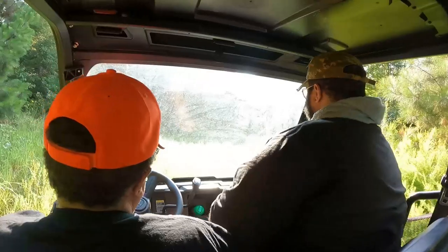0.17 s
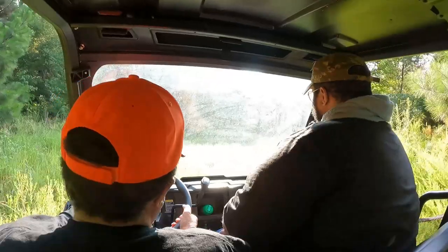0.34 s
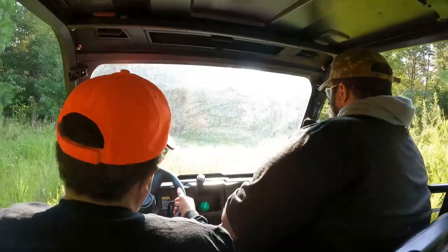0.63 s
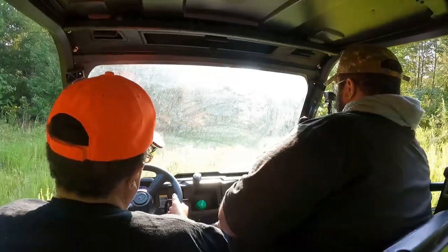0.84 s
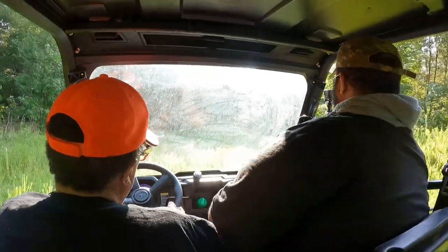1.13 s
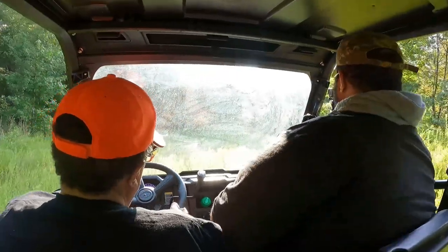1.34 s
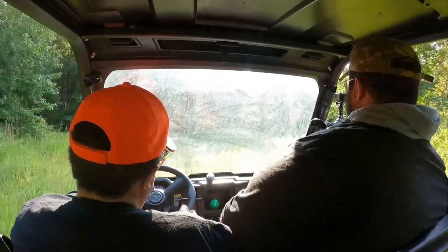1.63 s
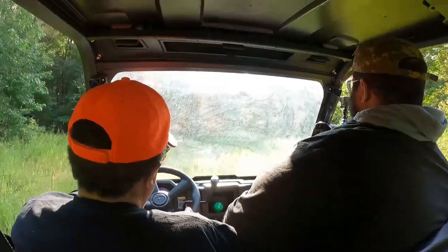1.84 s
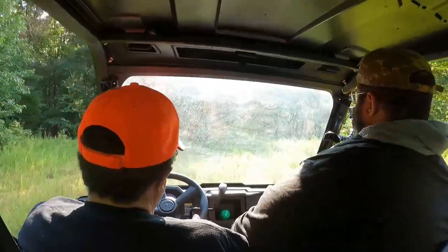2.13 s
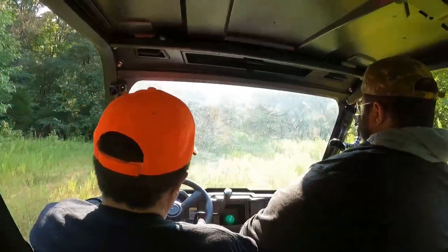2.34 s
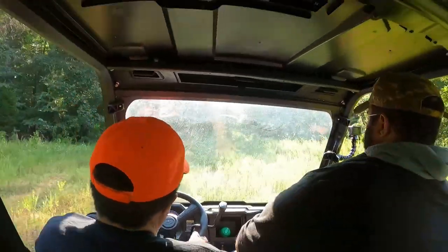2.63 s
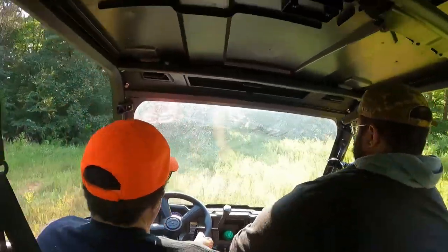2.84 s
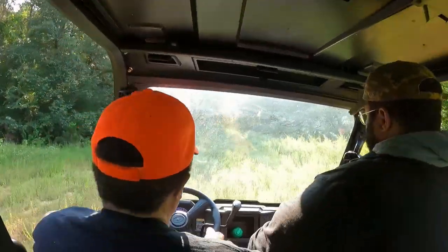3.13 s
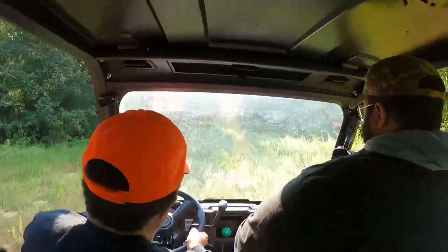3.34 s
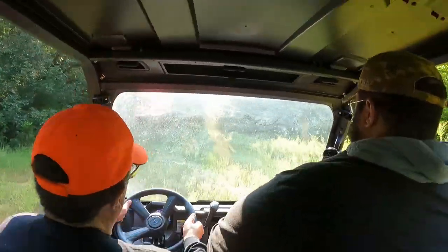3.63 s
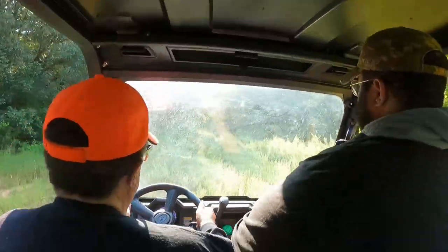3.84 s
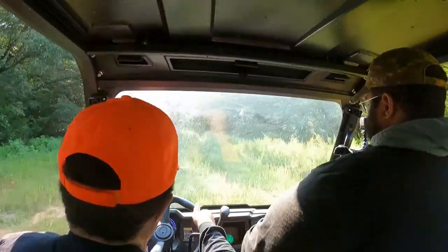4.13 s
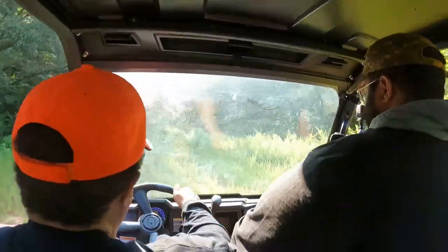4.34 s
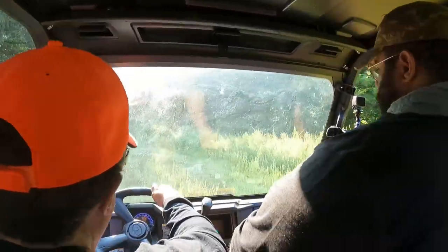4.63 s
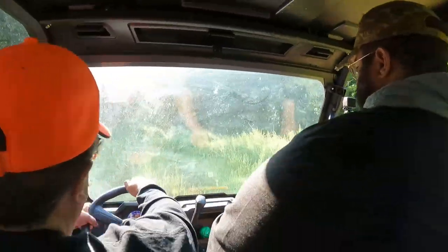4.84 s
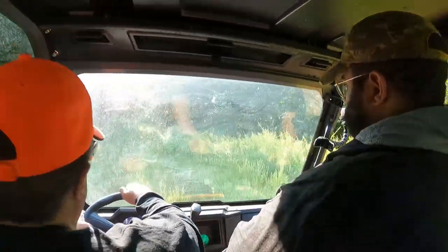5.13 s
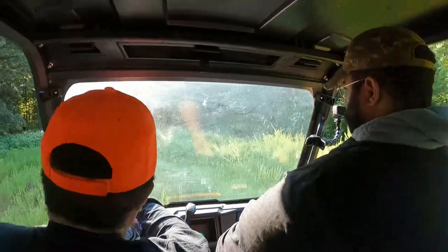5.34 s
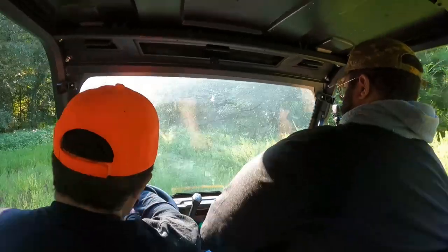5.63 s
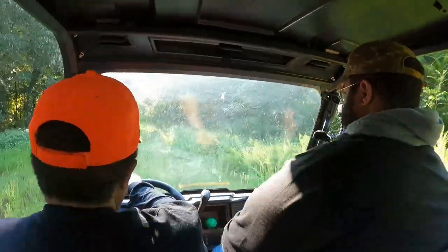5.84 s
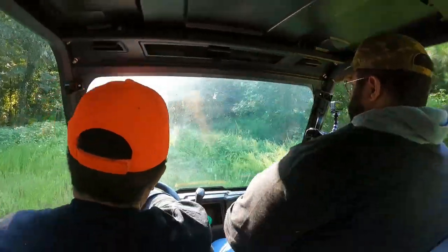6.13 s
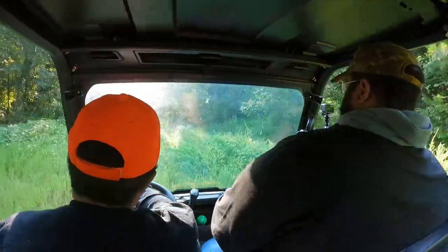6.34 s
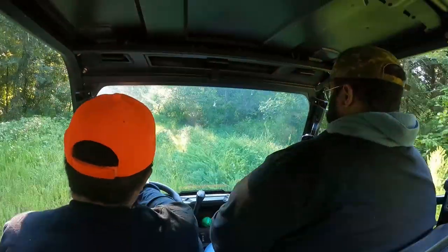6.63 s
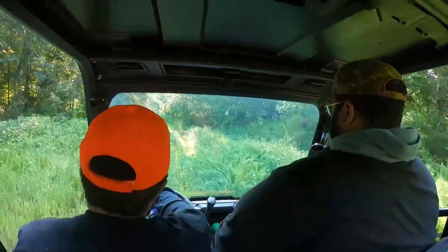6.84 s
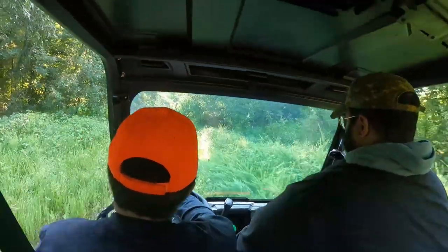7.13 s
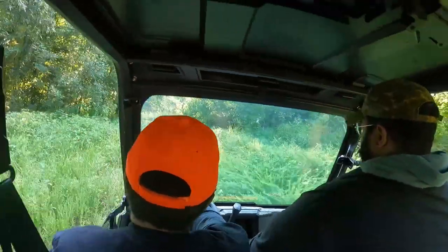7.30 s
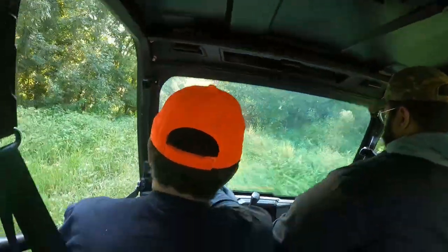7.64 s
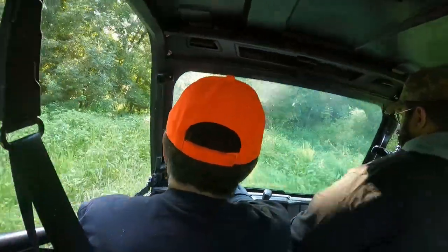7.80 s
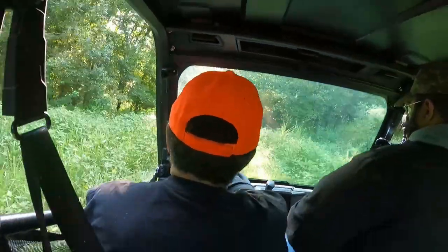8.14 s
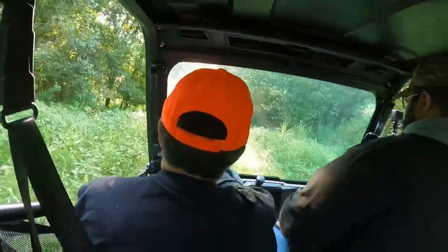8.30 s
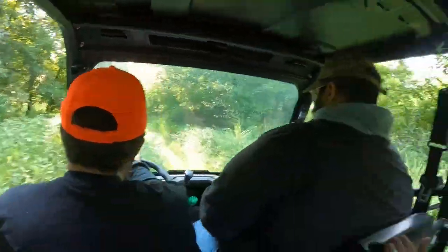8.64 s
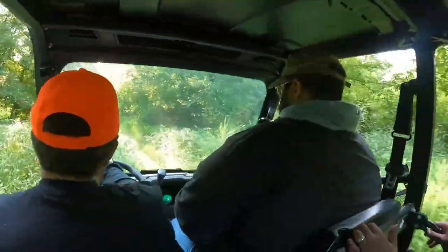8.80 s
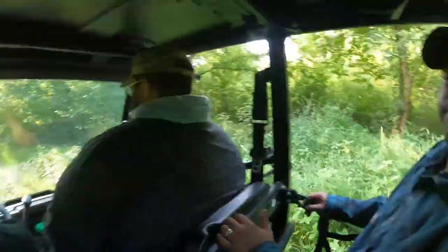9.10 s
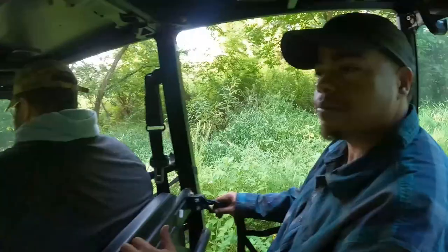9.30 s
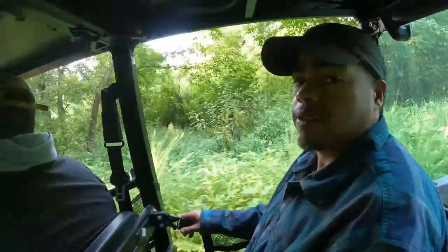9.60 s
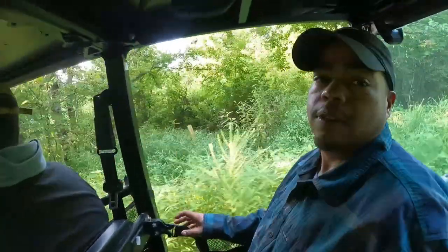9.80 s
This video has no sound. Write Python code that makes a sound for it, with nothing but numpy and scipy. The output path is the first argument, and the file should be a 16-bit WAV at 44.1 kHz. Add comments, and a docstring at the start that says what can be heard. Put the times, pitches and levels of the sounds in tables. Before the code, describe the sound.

A steady, boomy engine dominates, heard close inside a roofed cab with open sides. Revs climb early, fall to a dull drone around the middle, then recover and rise slightly. Beneath are thin mechanical whines and belt hiss; around them, low ground rumble, rut thumps, small plastic knocks, a few metallic clinks and soft brushing stalks. The stereo microphone rides with the vehicle.

```python
"""Open cab through tall grass

A small utility vehicle drives through tall grass, heard from its back seat by two microphone ports close together.
Engine orders boom under the roof as the twin-cylinder engine pulls, eases off and pulls again; shaped noise and
resonances give its clatter and intake, and gliding tones and narrow bands its gear, pump and belt whine.
Noise drums as tyres, thumps into ruts and brushes as stalks; decaying modes make fittings and panels rattle."""
import sys
import numpy as np
from scipy import signal
from scipy.fft import rfft, irfft, next_fast_len
from scipy.io import wavfile
from scipy.ndimage import uniform_filter1d, minimum_filter1d

SR = 44100
rng = np.random.default_rng(int(sys.argv[2]) if len(sys.argv) > 2 else 0)


def transcribe(signal):
    """Save signal, clipped to [-1, 1], as a 16-bit WAV file at the path in sys.argv[1]."""
    frames = np.atleast_2d(signal).T
    limited = np.clip(frames, -1, 1)
    pcm = np.round(limited * 32767).astype(np.int16)
    wavfile.write(sys.argv[1], SR, pcm)


N = 439236
TIME = np.arange(N) / SR
BINS = np.fft.rfftfreq(N, 1 / SR)
EASE_S = 0.26  # time to drive into or out of a stretch


def amp(db):
    """Decibels to gain."""
    return np.exp(np.asarray(db) * (np.log(10) / 20))


def unit(x):
    """Scales to rms 1."""
    return x / np.sqrt(np.mean(x ** 2) + 1e-20)


def at_hz(points, hz):
    """Reads a spectrum on a log-frequency axis."""
    f, value = np.transpose(points)
    return np.interp(np.log(hz + 1), np.log(f + 1), value)


def hump(hz, centre_hz, half_width_hz):
    """1 at the centre of a band of pitches, a half at its edges, falling steeply beyond."""
    return 1 / (1 + ((hz - centre_hz) / half_width_hz) ** 4)


def curves(rows):
    """One sample-rate curve for each value column of a time table."""
    s, *columns = np.transpose(rows)
    return [np.interp(TIME, s, column) for column in columns]


def stretches(rows):
    """One curve for each value column of a (start, end, ..) table; zero outside the stretches."""
    total = 0
    for start, end, *values in rows:
        inside = np.clip(np.minimum(TIME - start, end - TIME) / EASE_S + .5, 0, 1)
        total = total + np.outer(values, inside)
    return total


def drift(rate_hz):
    """Smooth random motion of rms 1, up to about the given rate."""
    points, points_per_s = 4096, 400
    hz = np.fft.rfftfreq(points, 1 / points_per_s)
    slow = irfft(rfft(rng.standard_normal(points)) / np.sqrt(1 + (hz / rate_hz) ** 6))
    return np.interp(TIME * points_per_s, np.arange(len(slow)), unit(slow))


def band_noise(hz, half_width_hz, size):
    """Two unrelated noises in one resonance, rms 1 together."""
    shape = 1 / (1 + ((np.fft.rfftfreq(size, 1 / SR) - hz) / half_width_hz) ** 2)
    return unit(irfft(rfft(rng.standard_normal((2, size))) * shape, size))


def add(mix, s, sound):
    """Adds a two-channel sound at time s."""
    part = mix[:, max(round(s * SR), 0):][:, :sound.shape[1]]
    part += sound[:, :part.shape[1]]


# likeness of the left and right microphone ports: (f/Hz, likeness 0-1)
PORT_LIKENESS = [(110, .999), (300, 0.92), (600, 0.72), (1200, 0.57), (3000, .64), (12000, 0.62)]
# lean towards the left port: (f/Hz, left minus right level/dB)
LEFT_LEAN = [(100, .25), (160, .6), (350, 1.5), (700, 2.8), (1400, 2.8), (3000, 1.6), (5500, 1.2),
             (10000, 2)]


def lean(line, hz):
    """Places one tone in the two ports with the level difference at its pitch."""
    left = amp(at_hz(LEFT_LEAN, hz) / 2)
    return np.array([[left], [1 / left]]) * line


def ports(pair, colour=((20, 0), (20000, 0))):
    """Colours two unrelated signals and blends them into the left and right ports."""
    a, b = rfft(pair)
    like = np.clip(at_hz(PORT_LIKENESS, BINS), 0, 1)
    mid = a * np.sqrt((1 + like) / 2)
    side = b * np.sqrt((1 - like) / 2)
    left = amp(at_hz(LEFT_LEAN, BINS) / 2)
    return irfft(np.array([(mid + side) * left, (mid - side) / left]) * amp(at_hz(colour, BINS)), N)


# stretches of bumpy ground: (start t/s, end t/s, added rumble level/dB)
BUMPY_GROUND = [(-.3, .15, 11.5), (3.15, 3.75, 9), (3.75, 4.1, 9.5), (5.2, 7.0, 7.5), (7.0, 7.7, 10),
                (7.7, 9.3, 4.5)]


def jolts():
    """Roughness of the ground in dB about its mean."""
    db, = stretches(BUMPY_GROUND)
    return db - db.mean()


# spells in which the pump whine comes through: (start t/s, end t/s, level/dB)
PUMP_SPELLS = [(-.3, 1.4, -59.5), (2.9, 3.707, -55), (3.7, 5.01, -59.5), (5.5, 5.85, -58)]


def pump(start_hz=2107, sag_hz_per_s=2.4, waver_hz=2.2, waver_db=2.5):
    """A thin electric whine, one sine that comes and goes and sags slowly in pitch."""
    size, = stretches([(start, end, amp(db)) for start, end, db in PUMP_SPELLS])
    turns = np.cumsum(start_hz - sag_hz_per_s * TIME + waver_hz * drift(10)) / SR
    return np.sqrt(2) * size * amp(waver_db * drift(5.5)) * np.sin(2 * np.pi * turns)


# drive belt hiss: (t/s, level/dB)
BELT_HISS = [(0, -58), (3.5, -58.5), (4.8, -62.5), (6, -59), (7.5, -56.5), (9.96, -54.5)]
# bands in which the belt drive sings:
# (f/Hz, half-width f/Hz, level/dB, added level/dB per Hz of engine speed, glide f/Hz per Hz of engine speed)
BELT_SONGS = [(3575, 98, -63.5, .9, 6), (4690, 100, -64.5, 1.2, 26), (6300, 230, -66, -0.5, 0.5)]


def belt(cycle_hz, centre_hz=6520, half_width_hz=600, waver_db=2.1):
    """The drive belt hisses, and its pulleys sing in narrow bands that swell and glide with the revs."""
    out = amp(curves(BELT_HISS)[0]) * band_noise(centre_hz, half_width_hz, N)
    revs = cycle_hz - cycle_hz.mean()
    for hz, width, db, swell, glide in BELT_SONGS:
        band = signal.hilbert(band_noise(hz, width, next_fast_len(N)))[:, :N]
        song = (band * np.exp(2j * np.pi * np.cumsum(glide * revs) / SR)).real  # shifts the band in pitch
        out += amp(db + swell * revs + waver_db * drift(11)) * song
    return ports(out)


# spells of gear whine: (start t/s, end t/s, start f/Hz, end f/Hz, level/dB)
GEAR_SPELLS = [(0.846, 1.701, 1204, 1246, -53), (1.553, 2.499, 931, 1005, -48.5),
               (6.301, 7.062, 992, 968, -48), (9.253, 9.961, 1059, 1013, -49.5)]


def gears(waver=.009, waver_db=3.5):
    """The gearbox gives a faint, unsteady, gliding whine while its teeth are loaded."""
    out = 0
    for start, end, from_hz, to_hz, db in GEAR_SPELLS:
        hz = np.interp(TIME, [start, end], [from_hz, to_hz]) * (1 + waver * drift(20))
        size, = stretches([(start, end, amp(db))])
        out = out + size * np.sin(2 * np.pi * np.cumsum(hz) / SR)
    return lean(np.sqrt(2) * out * amp(waver_db * drift(22)), GEAR_SPELLS[0][2])


# colour of stalks against the body: (f/Hz, relative level/dB per Hz)
BRUSH_COLOUR = [(1000, -12.5), (2300, 4.5), (3200, -0.5), (4450, -1), (5200, -2), (5800, -7), (7500, -9),
                (8700, -16.5), (12500, -23), (15000, -43.5)]


def grass(level_db, fine_db, fine_hz=7000, swish_db=2.0,
          stalks_per_s=130, stalk_db=-3.0, spread_db=-1.0, flick_s=0.0068):
    """A swish of blades along the body, with single stalks flicking against it; fine grass hisses higher."""
    hits = (rng.random(N) < stalks_per_s / SR) * amp(spread_db * np.minimum(rng.exponential(1, N), 4))
    flicks = unit(signal.lfilter([1], [1, -np.exp(-1 / (flick_s * SR))], hits))
    weeds = amp(0.62 * jolts())  # rough ground carries stiffer stalks
    contact = np.hypot(amp(swish_db * drift(30)), amp(stalk_db) * flicks * weeds)
    swish = unit(ports(contact * rng.standard_normal((2, N)), BRUSH_COLOUR))
    fine = swish - irfft(rfft(swish) / (1 + (BINS / fine_hz) ** 6), N)  # the part above fine_hz
    return amp(level_db) * (swish + (amp(fine_db) - 1) * fine)


def bodywork(swish_db, level_db=-47.5, taps_per_s=36, spread_db=3.0, tap_s=0.016, follow=0.25, brushed=0.95):
    """Small jolts and stiff weeds make the dash, roof and cargo bed clack at random: decaying noise taps."""
    hits = (rng.random(N) < taps_per_s / SR) * amp(spread_db * np.minimum(rng.exponential(1, N), 2.5))
    fade = signal.lfilter([1], [1, -np.exp(-1 / (tap_s * SR))], hits)
    clacks = unit(ports(fade * rng.standard_normal((2, N)), CLATTER_COLOUR))
    return amp(level_db + follow * jolts() + brushed * swish_db) * clacks


# plastic panels knocking: (t/s, relative level/dB, ring f/Hz)
PANEL_KNOCKS = [(2.362, -24.5, 1063), (3.83, -31, 703), (3.925, -31, 649.6), (4.883, -26.5, 973),
                (4.925, -29.5, 587), (5.257, -25.5, 1092), (7.07, -32, 704), (7.055, -30, 1090),
                (7.726, -30, 620), (8.365, -32.5, 669.3), (8.48, -32, 1080), (8.813, -26, 1221),
                (9.752, -31, 980.5)]


def knocks(rise_s=0.0056, t60=0.089, trim_db=2.5, dull=0.55, half_width_hz=220):
    """A panel takes a soft blow and gives one short hollow note among duller neighbours."""
    out, t = np.zeros((2, N)), np.arange(SR // 8) / SR
    for s, db, hz in PANEL_KNOCKS:
        note = np.sin(2 * np.pi * hz * t) + dull * band_noise(hz, half_width_hz, len(t))
        add(out, s, note * (1 - np.exp(-t / rise_s)) * amp(db + trim_db - 60 * t / t60))
    return ports(out)


# what every loose fitting rings with: (f/Hz, relative level/dB, 60 dB decay t/s)
FITTING_MODES = [(630, 1, 0.21), (1000, -1.5, 0.13), (1080, 0.5, 0.092), (1700, -2, 0.14),
                 (2240, -4, 0.086), (3150, -6, 0.089), (3740, -2, 0.076), (5140, -9, 0.086),
                 (6300, -0.5, 0.013), (6830, 2.5, 0.063), (9400, -13, 0.017), (11500, -17, .03)]


def fitting(clack, ring, tick, note_hz=None, clack_db=2.5, ring_db=10.5, tick_db=7.0,
            rise_cycles=0.99, chatter_s=0.0033, bounce_s=0.014, bounce_db=-13.5,
            cluster=0.17, main_db=0.5, main_half_width_hz=170, main_t60=0.068):
    """A fitting chatters for a few milliseconds, bounces once, and rings in clusters of close modes."""
    out, t = 0, np.arange(SR // 8) / SR
    since_bounce = np.maximum(t - bounce_s * rng.uniform(.7, 1.3), 0)
    modes = [(hz, cluster * hz, db, t60) for hz, db, t60 in FITTING_MODES]
    if note_hz:  # its own note
        modes.append((note_hz, main_half_width_hz, main_db, main_t60))

    def strike(since, hz, t60):
        fall = amp(-60 * np.maximum(since - chatter_s, 0) / t60)
        return fall * (1 - np.exp(-since * hz / rise_cycles))

    for hz, width, db, t60 in modes:
        if hz < 2700:
            blow_db = clack + clack_db
        elif hz < 5600:
            blow_db = ring + ring_db
        else:
            blow_db = tick + tick_db
        shape = np.hypot(strike(t, hz, t60), amp(bounce_db) * strike(since_bounce, hz, t60))
        out = out + .5 * amp(blow_db + db) * band_noise(hz, width, len(t)) * shape
    return out


# loose fittings: (t/s, low clack, ring and bright tick relative level/dB, main ring f/Hz)
LOOSE_FITTINGS = [(2.577, -41.5, -46.5, -60, 3480), (2.733, -52, -50.5, -47.5, 2980),
                  (3.171, -36, -51, -49.5, 4100), (3.637, -49, -49, -49, 3630),
                  (3.885, -37.5, -49.5, -67, 3768), (5.215, -37, -50, -60, 3160),
                  (5.744, -40, -42, -63, 3400), (5.758, -39.5, -51, -55, 4185),
                  (5.846, -31.5, -46, -48, 3570), (5.869, -33, -56, -58, 2400),
                  (6.029, -37.5, -50, -59, 3759), (6.367, -40, -52, -51.5, 3525),
                  (6.613, -35.5, -51, -55, 3590), (7.029, -32.5, -46, -51, 4640),
                  (7.049, -35, -49, -50, 4151), (7.731, -39, -45.5, -65, 3890),
                  (8.148, -34, -44.5, -49.5, 2993), (8.815, -45, -48, -53, 3597),
                  (9.745, -42, -52.5, -64, 3806)]
# metal parts striking the cage:
# (t/s, part, main ring f/Hz, its ring level/dB, low clack, rattle and bright tick relative level/dB)
CAGE_CLANKS = [(3.736, "latch", 4820, -22.5, -36, -37, -46), (4.199, "buckle", 3500, -37, -37, -43.5, -49),
               (4.877, "buckle", 3480, -34, -32.5, -41.5, -46),
               (6.845, "buckle", 3634, -27.5, -42, -42, -45)]
# modes of each metal part, reference mode first: (f/Hz, relative level/dB, 60 dB decay t/s)
METAL_MODES = {"latch": [(4810, 0, 0.049), (1054, -12, 0.26), (2200, -6, 0.11), (2437, -7, 0.048),
               (3400, -14, 0.14), (4097, -8, 0.083), (5150, -11, 0.093), (6900, -10, 0.041),
               (7300, -10, 0.055)], "buckle": [(3640, 1, 0.06), (3540, -1, 0.078), (1253, -8, 0.23),
               (5400, -10, 0.072), (7000, -14.5, 0.078)]}


def rattles(rise_s=0.00097):
    """Loose fittings rattle; a latch and a buckle strike the cage and ring with clear metal notes."""
    out, t = np.zeros((2, N)), np.arange(SR // 5) / SR
    for s, *blow in LOOSE_FITTINGS:
        add(out, s, fitting(*blow))
    for s, part, main_hz, part_db, *blow in CAGE_CLANKS:
        add(out, s, fitting(*blow))
        pitch = main_hz / METAL_MODES[part][0][0]
        ring = 0
        for hz, db, t60 in METAL_MODES[part]:
            phase = rng.random((2, 1))
            ring = ring + amp(part_db + db - 60 * t / t60) * np.sin(2 * np.pi * (pitch * hz * t + phase))
        add(out, s, ring * (1 - np.exp(-t / rise_s)))
    return ports(out)


# a wheel drops into a rut: (t/s, sway of the frame level/dB, boom of the floor level/dB)
RUT_THUMPS = [(0.169, -32, -17), (3.79, -15.5, -24.5), (5.335, -27, -19.5), (5.885, -23, -20),
              (6.271, -32, -16.5), (8.055, -26, -15.5), (8.299, -20, -34.5)]


def thumps(frame_hz=46, floor_hz=112, half_width_hz=26, swell_s=.024, panel_hz=215, panel_db=-11.5):
    """A rut heaves the frame and makes the floor boom, with a hollow note from the side panels."""
    out, t = np.zeros((2, N)), np.arange(SR // 4) / SR
    blow = t / swell_s * np.exp(1 - t / swell_s)
    for s, frame_db, floor_db in RUT_THUMPS:
        modes = [(frame_hz, frame_db), (floor_hz, floor_db), (panel_hz, floor_db + panel_db)]
        add(out, s, blow * sum(amp(db) * band_noise(hz, half_width_hz, len(t)) for hz, db in modes))
    return ports(out)


# colour of the ground rumble: (f/Hz, relative level/dB per Hz)
RUMBLE_COLOUR = [(10, -19), (20, -7.5), (28, 2), (44, 7.5), (64, 1.5), (85, 5.5), (108, 6), (140, -3),
                 (175, -9), (215, -12), (300, -22.5), (500, -29.5), (2500, -86)]


def tyres(smooth_db=-27.5, jolt_db=1.2):
    """Bumps in the ground drum through the frame as low noise, louder on bumpy stretches."""
    rumble = unit(ports(rng.standard_normal((2, N)), RUMBLE_COLOUR))
    return rumble * amp(smooth_db + stretches(BUMPY_GROUND)[0] + jolt_db * drift(4.5))


# resonances of the airbox: (f/Hz, relative level/dB, swell t/s)
AIRBOX_MODES = [(470.6, -0.5, 0.016), (417, -0.5, 0.0096)]


def intake(turns, coast, load_db, level_db=-44.0, pull=0.31, shut_db=-1.0,
           uneven_db=1.5, second=0.92, turbulence=0.73):
    """Each cylinder's gulp of air rings the airbox, which hums when the revs fall in step with it."""
    first_gulp = np.diff(np.floor(turns), prepend=0)
    second_gulp = np.diff(np.floor(turns + .5), prepend=0)
    air = unit(first_gulp + second * second_gulp) + turbulence * rng.standard_normal(N)
    air *= amp(uneven_db * drift(18) + shut_db * coast + pull * load_db)
    t, note = np.arange(SR // 6) / SR, 0
    for hz, db, swell_s in AIRBOX_MODES:
        note = note + amp(db) * t / swell_s * np.exp(-t / swell_s) * np.sin(2 * np.pi * hz * t)
    hum = unit(signal.oaconvolve(air, note)[:N])
    return lean(amp(level_db) * hum, AIRBOX_MODES[0][0])


# colour of the engine block and of clacking bodywork: (f/Hz, relative level/dB per Hz)
CLATTER_COLOUR = [(170, -2.5), (280, 3), (370, 0), (460, 4.5), (520, -0.5), (680, 0), (830, -6), (980, 0),
                  (1250, -2), (1420, -6.5), (1750, -4), (2400, -16.5), (4000, -22), (13000, -61)]


def clatter(turns, level_db, lag=0.34, burst=0.054, steady=1.0, valve=0.24, flutter_db=1.0):
    """Each firing shakes a burst of noise out of the block; the valves tap between."""
    # lag and burst are in cycles
    firing = np.exp(-(turns % 1) / burst) + 0.56 * np.exp(-((turns - lag) % 1) / burst)
    valves = valve * np.exp(-(4 * turns % 1) / 0.29)
    shaken = (steady + firing + valves) * amp(flutter_db * drift(28)) * rng.standard_normal((2, N))
    return amp(level_db) * unit(ports(shaken, CLATTER_COLOUR))


# boom of the cab as a low engine order passes each pitch: (f/Hz, relative level/dB)
CAB_BOOM = [(23, -44.5), (31, -20), (44, -27.5), (62, -25.5), (72, -15), (80, -25), (91, -15), (101, -13.5),
            (116, -16.5), (127, -33.5), (136, -23.5), (152, -18), (174, -29), (190, -28)]
# engine orders 1 to 6: (strength level/dB, added level/dB on the full overrun)
LOW_ORDERS = [(1.5, -5), (-2, -2), (-6, 0.5), (0.04, 1), (0.77, -4), (-9.5, -23)]
# exhaust overtones as the cab passes them: (f/Hz, relative level/dB of a line)
OVERTONE_LEVELS = [(182, -44), (190, -40.5), (207, -36), (220, -42.5), (237, -47.5), (280, -38.5),
                   (315, -52), (345, -45.5), (380, -55.5), (425, -45.5), (470, -50), (520, -55.5),
                   (610, -56), (800, -61.5), (1000, -57), (1700, -64.5)]
# pipe resonances that open up when the engine pulls: (f/Hz, half-width f/Hz, added level/dB per dB of load)
PIPE_RESONANCES = [(210, 20, 1.3), (321, 32, 2.5), (462, 11, -0.5), (618.6, 18, 3), (1560, 140, 1.1)]
# the upper boom, which swells and fades in the cab: (t/s, added level/dB)
UPPER_BOOM_SWELL = [(0, -3.5), (3.3, -1), (4.3, 1.5), (5.5, -2), (6.6, 6), (7.3, 1.5), (8.6, -3),
                    (9.96, 10)]
UPPER_HZ, UPPER_HALF_WIDTH_HZ = 166, 26.7


def exhaust(turns, cycle_hz, load_db, coast, sway_db=1.38, sway_hz=3, damping=0.23, waver_db=2.5,
            drone_hz=224, drone_half_width_hz=26, drone_db=16.0, shut_db=-6, rasp=0.45, count=56):
    """Each four-stroke cycle makes a stack of orders; the lowest boom as they pass the cab's resonances."""
    out, upper_db = np.zeros((2, N)), curves(UPPER_BOOM_SWELL)[0]
    shaking = amp(jolts())
    rocking = .19 * shaking
    ride_db = damping * jolts()  # the boom is fullest and steadiest on smooth ground
    firing_db = 1.5 * drift(23)  # no two cycles burn alike
    pulling_db = np.maximum(load_db, 0)
    for k in range(1, count + 1):
        hz, angle = k * cycle_hz, 2 * np.pi * k * turns
        if k <= len(LOW_ORDERS):
            order_db, coasting_db = LOW_ORDERS[k - 1]
            sway = (sway_db + ride_db / 2) * drift(sway_hz)
            size = amp(at_hz(CAB_BOOM, hz) + order_db + coasting_db * coast + sway - ride_db)
            # the crank surges once a cycle, which sets odd orders a quarter turn from even ones
            line = size * np.cos(angle + k % 2 * np.pi / 2)
        else:
            # the overrun dulls the overtones but brings out a pipe drone
            overrun_db = coast * (shut_db + drone_db * hump(hz, drone_hz, drone_half_width_hz))
            # load sharpens the pulses and lifts high orders most
            pull_db = rasp * np.log(k / len(LOW_ORDERS)) * load_db
            for f, width, lift in PIPE_RESONANCES:
                if hz.min() < 2 * f:
                    pull_db += pulling_db * lift * hump(hz, f, width)
            waver = waver_db * np.sqrt(shaking) * drift(3.65)
            size = amp(at_hz(OVERTONE_LEVELS, hz) + pull_db + overrun_db + firing_db + waver)
            # overtones arrive by many paths, which shift as the cab rocks
            line = size * np.cos(angle + 2 * np.pi * rng.random() + rocking * drift(16.0))
        if hz.min() < 2 * UPPER_HZ:
            line *= amp(upper_db * hump(hz, UPPER_HZ, UPPER_HALF_WIDTH_HZ))
        out += lean(line, hz.mean())
    return out


# engine speed: (t/s, four-stroke cycle rate f/Hz)
ENGINE_SPEED = [(0.0, 26.03), (0.22, 25.38), (0.48, 26.2), (0.73, 25.45), (1.0, 27.14), (1.14, 26.56),
                (1.82, 30.65), (2.3, 31.43), (2.5, 30.54), (2.68, 30.27), (3.08, 30.47), (3.27, 29.49),
                (3.45, 29.83), (3.72, 28.85), (3.9, 26.15), (4.06, 26.7), (4.3, 25.09), (4.55, 24.6),
                (5.03, 22.39), (5.15, 21.17), (5.47, 25.61), (5.77, 26.07), (7.17, 25.3), (8.23, 26.37),
                (8.45, 25.91), (8.63, 28.15), (9.0, 27.55), (9.25, 28.11), (9.48, 27.15), (9.75, 27.25),
                (9.96, 26.7)]
# the throttle is shut and the wheels turn the engine: (start t/s, end t/s, overrun 0-1)
OVERRUN_SPELLS = [(4.13, 5.28, 0.7)]
# stands of taller grass: (start t/s, end t/s, added swish level/dB, added fine hiss level/dB)
TALL_GRASS = [(1.45, 2.25, 2.5, 0.5), (2.55, 2.92, 3.5, 2), (3.5, 3.92, 4.5, -1.5), (4.9, 5.35, 1, 1.5),
              (5.65, 5.95, 0.5, -3), (6.35, 7.15, 2.5, 1), (7.15, 10.3, 1.5, 3.5)]
GRASS_DB, CLATTER_DB = -51.5, -41.1  # in short grass at cruising revs
CRUISE_HZ = 26.45
THROTTLE_LEAD_S = 0.3  # the load rises this long before the revs follow
LOAD_DB_PER_HZ, GRASS_DRAG = 0.68, 0.24  # load per Hz above cruising, and per dB of added swish


def scene(exhaust_db=1.5, clatter_share=0.94, slowing_db=-2.0):
    """Engine speed and the drag of the grass set the load; the ground and the grass add the rest."""
    cycle_hz, = curves(ENGINE_SPEED)
    coast, = stretches(OVERRUN_SPELLS)
    swish_db, fine_db = stretches(TALL_GRASS)
    wanted_hz = np.interp(TIME + THROTTLE_LEAD_S, TIME, cycle_hz)
    revs_db = LOAD_DB_PER_HZ * np.maximum(np.maximum(cycle_hz, wanted_hz) - CRUISE_HZ, 0)
    load_db = revs_db + GRASS_DRAG * swish_db
    turns = np.cumsum(cycle_hz * (1 + 0.00405 * drift(8.2))) / SR  # in four-stroke cycles

    whines = pump() + belt(cycle_hz) + gears()
    brushing = grass(GRASS_DB + swish_db + slowing_db * coast, fine_db)
    loose_parts = bodywork(swish_db) + knocks() + rattles()
    ground = thumps() + tyres()
    engine = intake(turns, coast, revs_db) + clatter(turns, CLATTER_DB + clatter_share * load_db)
    engine += amp(exhaust_db) * exhaust(turns, cycle_hz, load_db - load_db.mean(), coast)
    return whines + brushing + loose_parts + ground + engine


def record(dry, ceiling=0.37, split_hz=350, edge_hz=14500):
    """A limiter on the bass holds the peaks of the boom; then soft ends and the band limit."""
    bass = irfft(rfft(dry) / (1 + (BINS / split_hz) ** 4), N)
    room = np.minimum(1, ceiling / (abs(bass).max(0) + 1e-9))
    gain = uniform_filter1d(minimum_filter1d(room, size=700), size=900)
    held = dry + (gain - 1) * bass
    held *= np.minimum(np.minimum(TIME, TIME[-1] - TIME) / .002, 1)
    low_pass = signal.firwin(255, edge_hz, window=("kaiser", 9), fs=SR)
    return signal.oaconvolve(held, low_pass[None], "same")


dry = scene()
out = record(dry)
transcribe(out)
```